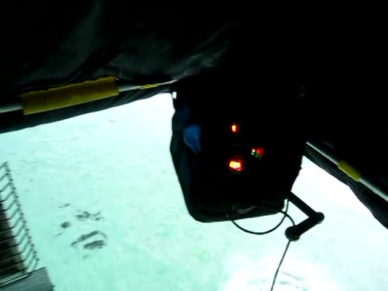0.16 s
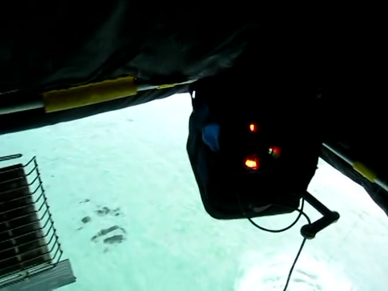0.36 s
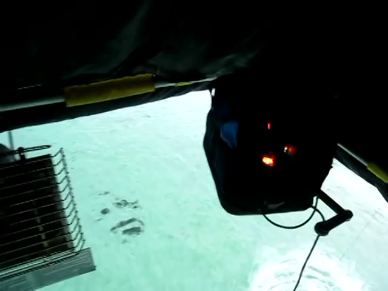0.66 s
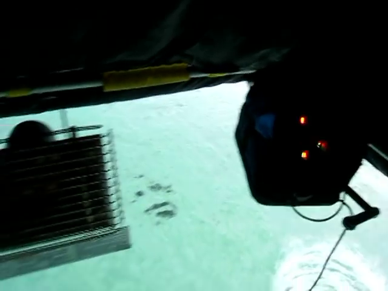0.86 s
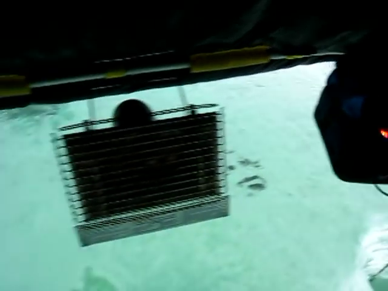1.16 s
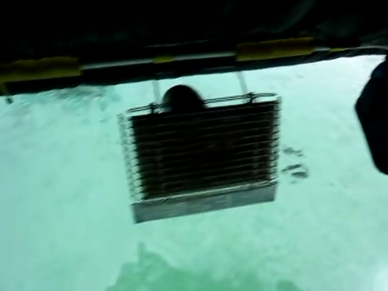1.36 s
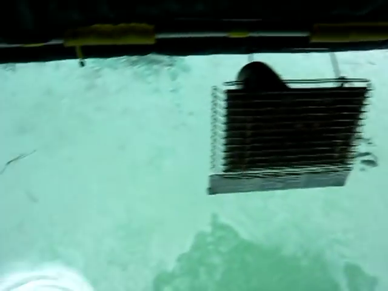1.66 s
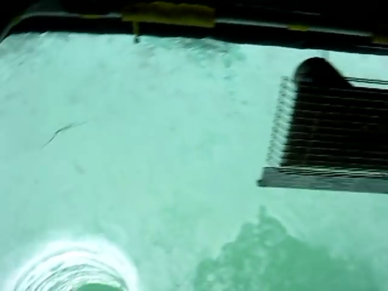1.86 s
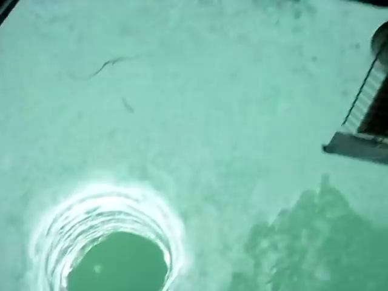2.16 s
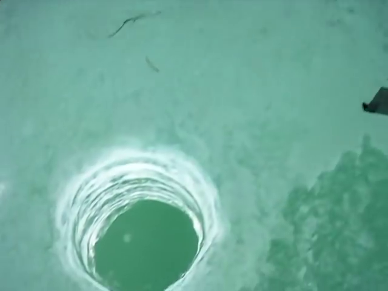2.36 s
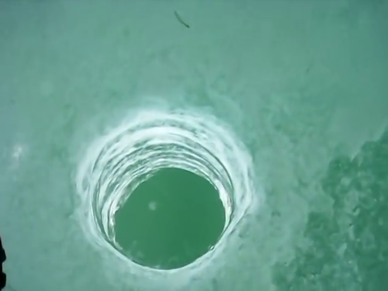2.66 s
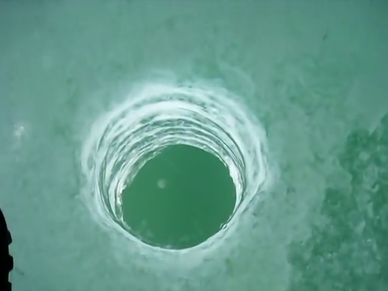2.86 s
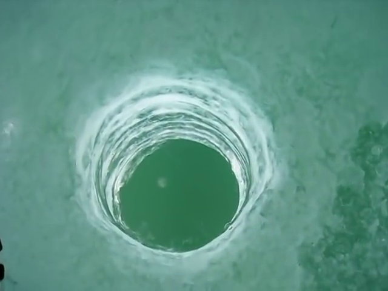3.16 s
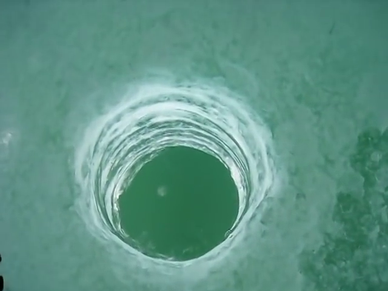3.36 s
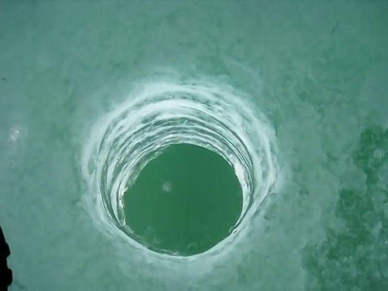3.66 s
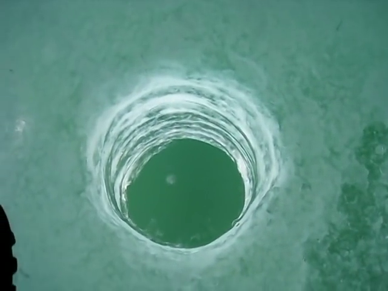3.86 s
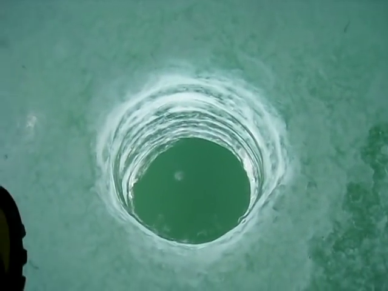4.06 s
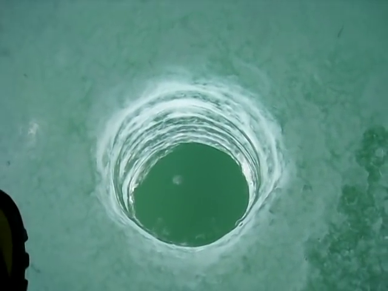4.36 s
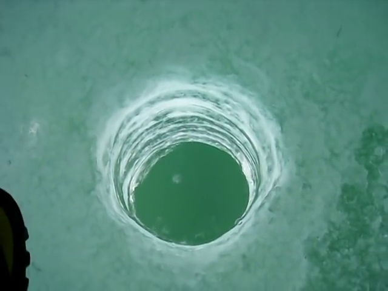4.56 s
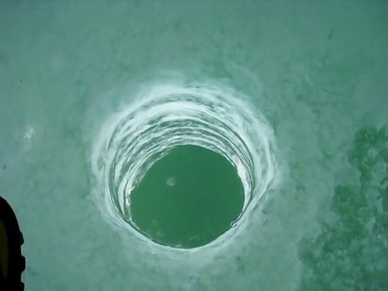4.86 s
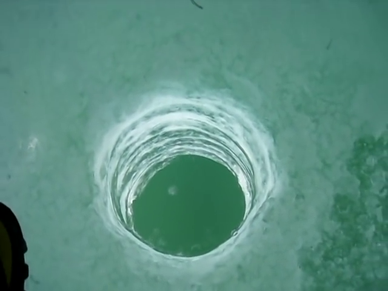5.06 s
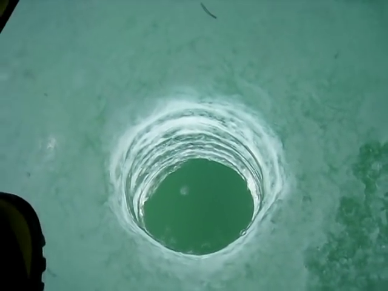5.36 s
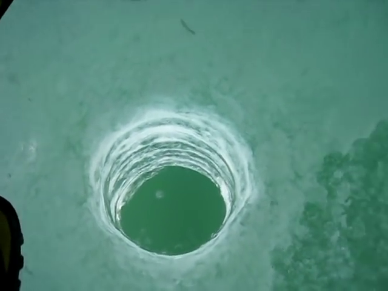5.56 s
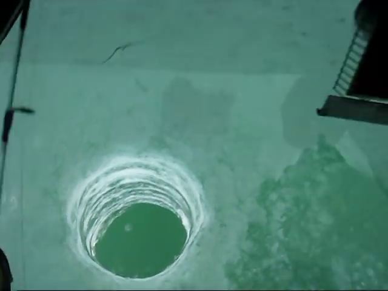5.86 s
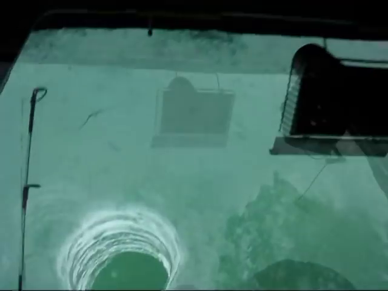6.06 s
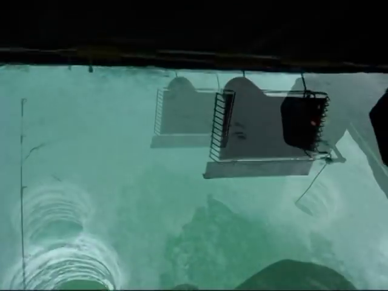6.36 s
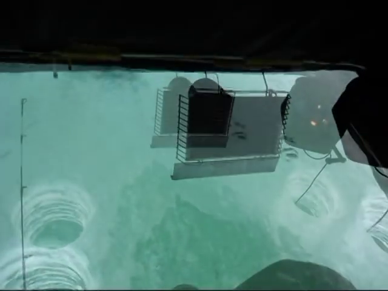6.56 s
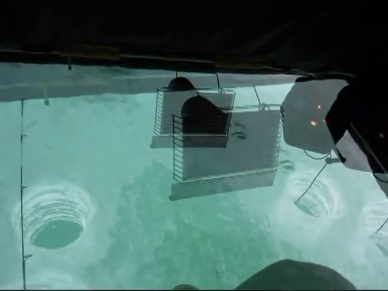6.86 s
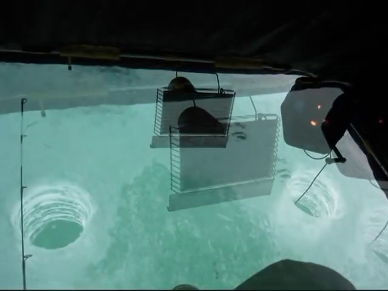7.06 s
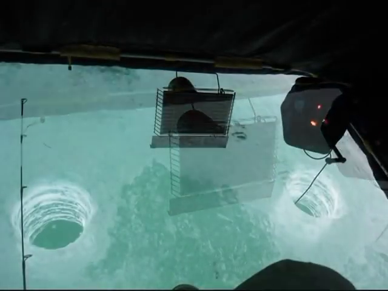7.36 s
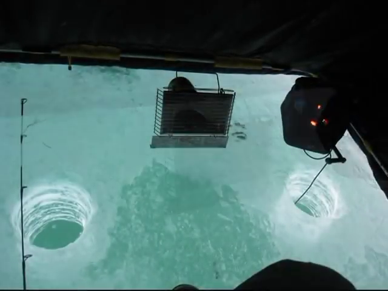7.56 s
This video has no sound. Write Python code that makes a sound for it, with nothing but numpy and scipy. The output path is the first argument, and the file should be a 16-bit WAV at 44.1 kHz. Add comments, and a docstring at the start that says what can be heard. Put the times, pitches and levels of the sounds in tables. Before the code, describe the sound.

Steady bright gas hiss and flickering thin whine over a faint low rumble, with close sleeve rustles, small clicks, one sharp knock, then a fade.

```python
"""A gas jet hisses and whines thinly: a propane heater in a small fabric shelter on the ice.
The hiss is shaped noise with near reflections, the whine a narrow flickering noise band; the flame
rumbles and drones low beneath. The microphone turns away and back: bright bands sweep through the hiss.
Nylon clothing swishes close by as noise shaped by strokes; gear knocks in damped cycles and clicks in
short rings. At the end the sound fades out."""
import sys
import numpy as np
from scipy import signal
from scipy.fft import rfft, irfft, next_fast_len
from scipy.io import wavfile
from scipy.ndimage import map_coordinates

SR = 44100
rng = np.random.default_rng(int(sys.argv[2]) if len(sys.argv) > 2 else 0)


def dump(signal):
    """Clip the signal to [-1, 1] and save it as 16-bit WAV at the path in sys.argv[1]."""
    limited = np.clip(np.atleast_2d(signal).T, -1, 1)
    pcm = np.round(limited * 32767).astype(np.int16)
    wavfile.write(sys.argv[1], SR, pcm)


N = 340011


def amp(db):
    """Decibels to an amplitude factor."""
    return 10 ** (np.asarray(db) / 20)


def unit(x):
    """Scale x to rms 1."""
    return x / np.sqrt(np.mean(x ** 2) + 1e-20)


def curves(rows):
    """One value per sample for each column after the time in seconds."""
    times_s, *columns = np.transpose(rows)
    return [np.interp(np.arange(N) / SR, times_s, column) for column in columns]


def wobble(rate):
    """A smooth random curve through normally distributed knots, rate knots a second."""
    knots = rng.standard_normal(int(N * rate / SR) + 4)
    return map_coordinates(knots, [np.arange(N) * rate / SR])


def filtered(x, response):
    """Multiply the spectrum of x by a response of frequency in Hz."""
    size = x.shape[-1]
    padded = next_fast_len(size + 8192)
    spectrum = rfft(x, padded) * response(np.fft.rfftfreq(padded, 1 / SR))
    return irfft(spectrum, padded)[..., :size]


def noise(spectrum):
    """Noise of rms 1 whose spectrum is drawn through (freq_hz, level_db) points on a log axis."""
    freq_hz, level_db = np.transpose(spectrum)

    def response(hz):
        return amp(np.interp(np.log(hz + 1), np.log(freq_hz), level_db))

    return unit(filtered(rng.standard_normal(N), response))


def narrow_noise(centre_hz, half_width_hz):
    """Turbulence in one resonance, whose centre may move: slow noise on two carriers in quadrature."""
    slow_cos, slow_sin = filtered(rng.standard_normal((2, N)), lambda hz: 1 / (1 + (hz / half_width_hz) ** 2))
    phase = 2 * np.pi * np.cumsum(centre_hz) / SR
    return unit(slow_cos * np.cos(phase) + slow_sin * np.sin(phase))


def add(track, start_s, sound):
    """Mix a short sound into the track at start_s."""
    part = track[round(start_s * SR):][:len(sound)]
    part += sound[:len(part)]


def walls(x, drift=0.046):
    """Near reflections comb the sound; each path drifts at random, drift being a share of its delay."""
    # paths off the ice and the walls: delay_s, strength (amplitude against the direct sound)
    paths = [(.00125, 0.16), (.0031, 0.28), (.0057, 0.0047), (.0094, .15), (0.0147, 0.23)]
    n = np.arange(N)
    total = x
    for delay_s, strength in paths:
        delay = delay_s * SR * (1 + drift * wobble(1.5))
        total = total + strength * np.interp(n - delay, n, x)
    return unit(total)


def shelter(x, t60_s=0.083, wet_db=-4.5):
    """The fabric walls give a very short answer: a decaying noise tail after 2 ms."""
    t = np.arange(SR // 5) / SR
    tail = rng.standard_normal(len(t)) * amp(-60 * t / t60_s) * (t > .002)
    return x + amp(wet_db) * signal.fftconvolve(x, tail / np.linalg.norm(tail))[:N]


def flame(rumble_db=-48.0, drone_db=-64):
    """The burner rumbles as shaped noise, and the air in the shelter drones at two low resonances."""
    # spectrum of the rumble: freq_hz, level_db (per Hz, relative)
    rumble_spectrum = [(20, -21.5), (45, -8), (65, -8.5), (90, 3.5), (115, 0), (170, 2), (260, -10),
                       (360, -11.5), (520, -5), (750, -10.5), (1400, -7.5), (2400, -13), (3500, -13),
                       (8000, -34.5)]
    drone = narrow_noise(np.full(N, 108.), half_width_hz=4.8)
    drone = drone + 0.51 * narrow_noise(np.full(N, 196.), half_width_hz=1.8)
    return amp(rumble_db) * walls(noise(rumble_spectrum)) + amp(drone_db) * drone


def crack(size, low_hz=700, high_hz=6500):
    """The noise of a hard contact, between two corner frequencies, rms 1."""
    def response(hz):
        return hz ** 2 / (hz ** 2 + low_hz ** 2) / (1 + (hz / high_hz) ** 2)

    return unit(filtered(rng.standard_normal(size), response))


def clicks(swell_s=0.0024):
    """A small part of the gear chatters against its neighbour and rings briefly in several modes."""
    # rattling clicks: start_s, level_db (peak of the ring, before the shelter answers), pitch_hz,
    # snap_db (bright contact noise against the ring, on a base of half amplitude), chatter_db (depth)
    rattles = [(0.6917, -25, 1987, 7.5, 1), (1.917, -17.5, 1970, -15, 4), (3.751, -33, 1920, 16, 3),
               (4.278, -20, 1825, -9, 8), (4.4794, -24.5, 1855, -6, 4.5)]
    # ringing modes of the part: ratio (multiple of the pitch), level_db (relative), t60_s
    modes = [(.6, -13, 0.023), (.78, -11, 0.024), (.92, -2.5, 0.023), (0.998, 6, 0.024),
             (1.12, -10.5, 0.02), (1.26, -9.5, 0.052), (1.76, -9.5, 0.056), (2.03, -7.5, 0.056)]
    track, t = np.zeros(N), np.arange(SR // 8) / SR
    contact = (t / swell_s * np.exp(1 - t / swell_s)) ** 2
    for start_s, level_db, pitch_hz, snap_db, chatter_db in rattles:
        chatter = amp(chatter_db * wobble(430)[:len(t)])
        ring = np.zeros(len(t))
        for ratio, mode_db, t60_s in modes:
            phase = 2 * np.pi * (ratio * pitch_hz * t + rng.random())
            ring += amp(mode_db - 60 * t / t60_s) * np.sin(phase)
        ring = ring * chatter * (1 - np.exp(-t / swell_s))
        snap = amp(snap_db) * contact * crack(len(t)) / 2
        add(track, start_s, amp(level_db) * (ring / np.abs(ring).max() + snap))
    return track


def knocks():
    """Each dry knock of gear is a swelling and dying tone with a bright crack under the same envelope."""
    # start_s, level_db (peak of the envelope, before the shelter answers), pitch_hz,
    # cycles (from the start to that peak), crack_db (on a base of half amplitude)
    hits = [(.249, -19, 857, 0.34, -8.5), (1.368, -26, 1070, 0.53, -11), (4.35, -26.5, 653, 0.66, -14.5),
            (5.2664, -18, 1533, 0.52, 3), (5.279, -14, 2290, 1.27, 3), (5.2801, -20, 720, 1.5, -23.5),
            (5.617, -26.5, 507, 0.51, -26), (5.6856, -1.5, 2090, .86, -21.5),
            (5.886, -19, 1550, 0.82, -9.5), (6.0357, -16.5, 1160, 0.46, -26),
            (6.4836, -19, 2160, 1.4, -0.5), (6.4845, -10.5, 12900, 5, -1.5),
            (6.7324, -14.5, 1870, .4, -6.5), (7.4175, -19.5, 2230, 2.1, -8.5), (7.4195, -25, 1330, 1.7, -7)]
    track, t = np.zeros(N), np.arange(SR // 20) / SR
    for start_s, level_db, pitch_hz, cycles, crack_db in hits:
        swell_s = cycles / pitch_hz
        u = t / swell_s
        envelope = (u * np.exp(1 - u)) ** 2
        tone = np.sin(2 * np.pi * pitch_hz * (t - swell_s))
        add(track, start_s, amp(level_db) * envelope * (tone + amp(crack_db) * crack(len(t)) / 2))
    return track


def stroke_shape(start_s, length_s, rise=0.15, fall=0.19):
    """The speed of one stroke: it builds up, then dies away; rise and fall are shares of its length."""
    u = np.clip((np.arange(N) / SR - start_s) / length_s, -10, 10)
    return 1 / (1 + np.exp(-u / rise)) / (1 + np.exp((u - 1) / fall))


def soft_ticks(rate, low_hz=350, high_hz=1500):
    """Dull ticks at random, on average rate a second, rms 1."""
    ticks = (rng.random(N) < rate / SR) * rng.uniform(-1.16, 1, N)
    return unit(filtered(ticks, lambda hz: (1j * hz / (low_hz + 1j * hz) / (1 + 1j * hz / high_hz)) ** 2))


def clothing(rub_db=1.0, swish_db=0, grain_db=1.0, swish_grain_db=1.4, catch_rate=30, catch_db=-14):
    """Sliding fabric slips and now and then catches: a dull rub and a bright nylon swish."""
    # spectra of the dull rub and of the nylon swish: freq_hz, level_db (per Hz, relative)
    rub_spectrum = [(100, -38), (260, -14), (400, -6.5), (540, -5.5), (750, -6.5), (1000, 1), (1600, -1),
                    (2100, 4.5), (2700, -1), (3600, -0.5), (6000, -10), (10000, -11), (16000, -32)]
    swish_spectrum = [(500, -41), (2500, -13), (4700, -4), (7000, -5.5), (9000, -3), (11300, -3),
                      (13200, -9.5), (14300, -9.5), (16000, -24)]
    # strokes of a sleeve over the jacket: start_s, length_s, rub_level_db, swish_level_db
    # (both levels before the trims rub_db and swish_db)
    strokes = [(0.158, 0.13, -44, -35.5), (0.253, 0.025, -32, -37), (0.301, 0.1, -31, -32.5),
               (0.636, 0.16, -40, -38), (0.828, 0.14, -39.5, -33), (1.136, 0.056, -42, -32.5),
               (1.093, 0.43, -41, -51), (1.998, 0.41, -46.5, -42.5), (2.902, 0.52, -37, -25),
               (3.525, 0.35, -41, -29), (4.725, 0.15, -44, -48), (5.662, 0.45, -34, -32.5),
               (6.083, 0.38, -41, -34.5), (6.398, 0.15, -35, -33), (7.131, 0.16, -41, -33)]
    rub_gain, swish_gain = amp(-56), amp(-52)  # the fabric never lies quite still
    for start_s, length_s, rub_level_db, swish_level_db in strokes:
        speed = stroke_shape(start_s, length_s)
        rub_gain = np.hypot(rub_gain, amp(rub_level_db) * speed)
        swish_gain = np.hypot(swish_gain, amp(swish_level_db) * speed)
    slips = wobble(160)
    rub = unit(walls(noise(rub_spectrum)) * amp(grain_db * slips))
    swish = unit(noise(swish_spectrum) * amp(swish_grain_db * slips))
    catches = amp(catch_db) * soft_ticks(catch_rate)
    return amp(rub_db) * rub_gain * (rub + catches) + amp(swish_db) * swish_gain * swish


def sweep(turn, edge_s=.15):
    """The bright band of one turn of the microphone, fading in before it and out after it."""
    centre_hz, level_db = curves(turn)
    start_s, end_s = turn[0][0], turn[-1][0]
    gate, = curves([(start_s - edge_s, 0), (start_s, 1), (end_s, 1), (end_s + edge_s, 0)])
    return gate * amp(level_db) * narrow_noise(centre_hz, half_width_hz=200)


def gas_jet(hiss_db=2.2, sweep_db=-1.0, whine_db=0, flutter_db=0.81, flicker_db=1.34):
    """Gas rushes through the orifice as broad noise and sings in a narrow band that flickers."""
    # spectrum of the hiss: freq_hz, level_db (per Hz, relative)
    hiss_spectrum = [(300, -40), (2000, -31), (3100, -20), (3850, -12), (4330, -9.5), (4780, -4.5),
                     (5120, -3.5), (5500, -4.5), (6900, 3), (8100, -11), (9200, -19), (11200, -9.5),
                     (13200, -10.5), (14500, -22)]
    # the hiss at the moving microphone: time_s, level_db (before the trim hiss_db)
    hiss_track = [(0, -35.5), (0.8, -34.5), (1.55, -35), (2.3, -32), (3.7, -32.5), (4.9, -33), (5.7, -32),
                  (6.2, -33), (7.6, -32)]
    # the whine, beamed and so more dependent on where the microphone points:
    # time_s, level_db (before flicker and flutter)
    whine_track = [(0, -37), (1.75, -38), (2.0, -33.5), (2.45, -34.5), (2.85, -28), (3.7, -24.5),
                   (3.95, -31), (4.35, -29), (4.6, -31.5), (4.9, -28.5), (5.3, -35.5), (5.8, -34.5),
                   (6.15, -30.5), (7.6, -31)]
    # the bright band in each of the microphone's two turns: time_s, centre_hz, level_db (before sweep_db)
    turns = [
        [(1.72, 5380, -45), (2.0, 5800, -35), (2.22, 6300, -39), (2.42, 5800, -32), (2.6, 5820, -38),
         (2.78, 6430, -32)],
        [(5.05, 6400, -37.5), (5.4, 6360, -32), (5.65, 5850, -30), (5.87, 6170, -35.5)],
    ]
    hiss_level_db, = curves(hiss_track)
    whine_level_db, = curves(whine_track)
    hiss = amp(hiss_level_db + hiss_db) * walls(noise(hiss_spectrum), drift=0.0055)
    sweeps = amp(sweep_db) * sum(sweep(turn) for turn in turns)
    whine_hz = 7160 + 55 * wobble(5)
    whine = narrow_noise(whine_hz, half_width_hz=167)
    whine = whine * amp(whine_level_db + whine_db + flicker_db * wobble(14))
    return (hiss + sweeps + whine) * amp(flutter_db * wobble(50))


def scene():
    """Everything reaches both channels alike; only the gear gets the shelter's answer."""
    mono = flame() + shelter(clicks() + knocks()) + clothing() + gas_jet()
    return np.array([mono, mono])


def record(dry, top_hz=15750):
    """The sound fades out at the end, and nothing from top_hz upward is kept."""
    # closing fade: time_s, gain (amplitude factor)
    fade = [(6.0, 1), (6.6, .5), (7.2, .25), (7.655, .032), (7.662, 0)]
    gain, = curves(fade)
    return filtered(dry * gain, lambda hz: hz < top_hz)


dry = scene()
out = record(dry)
dump(out)
```